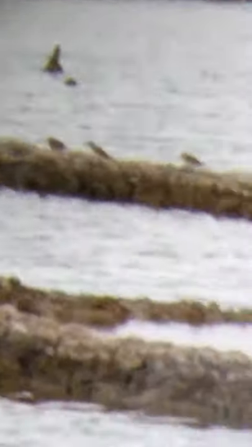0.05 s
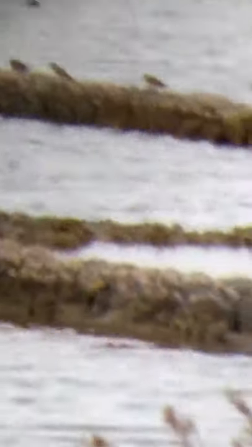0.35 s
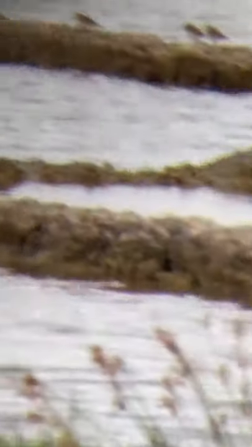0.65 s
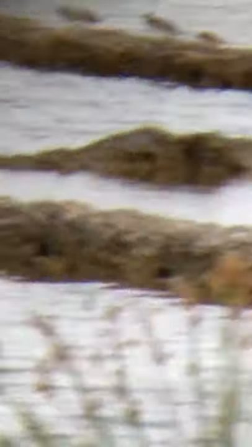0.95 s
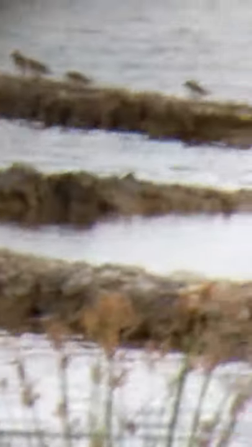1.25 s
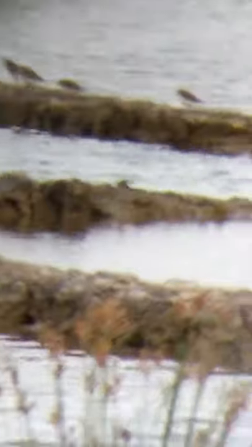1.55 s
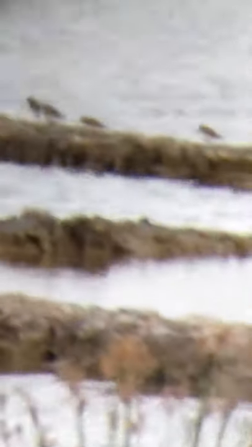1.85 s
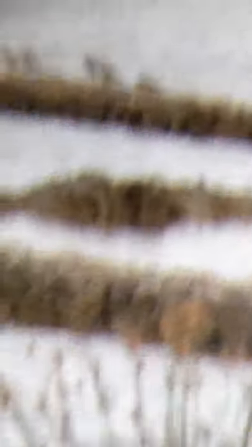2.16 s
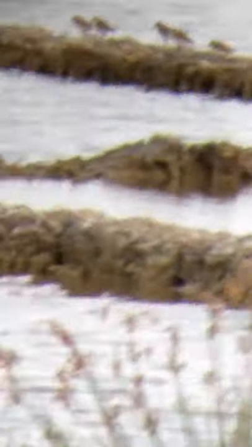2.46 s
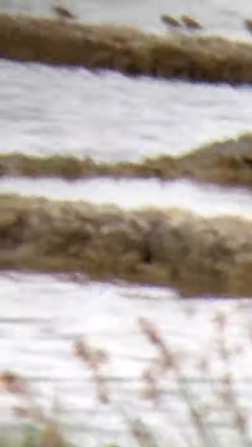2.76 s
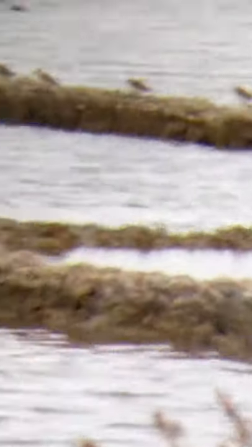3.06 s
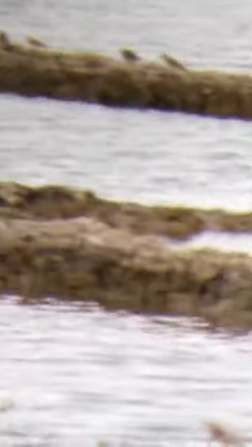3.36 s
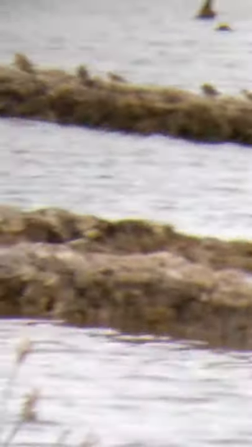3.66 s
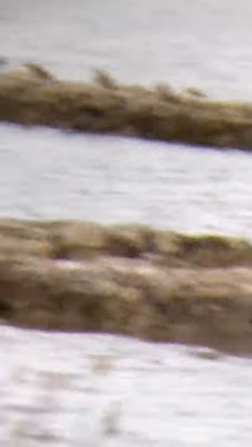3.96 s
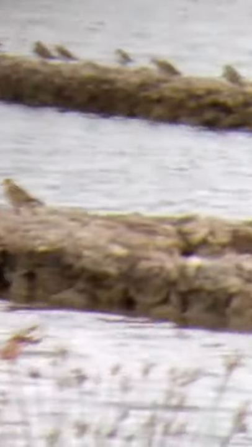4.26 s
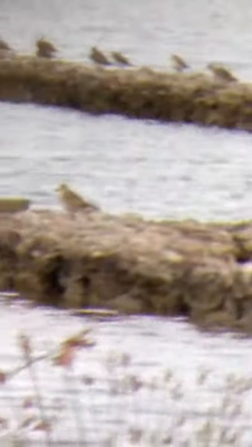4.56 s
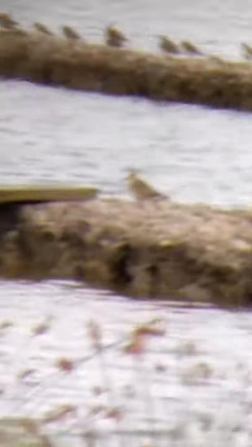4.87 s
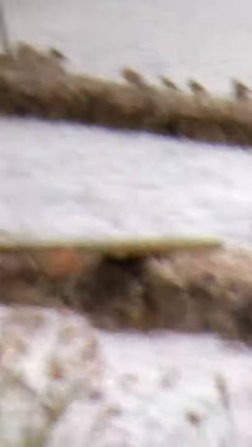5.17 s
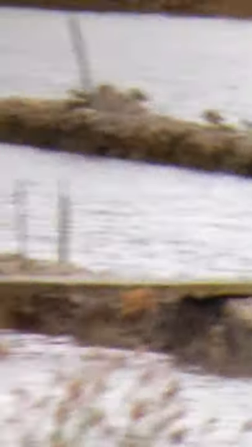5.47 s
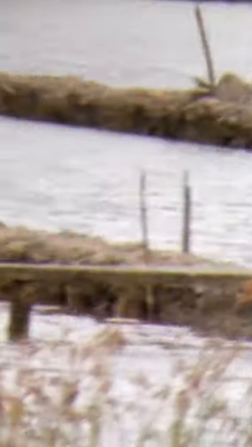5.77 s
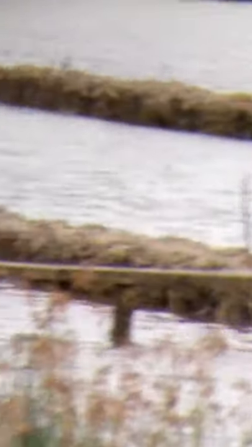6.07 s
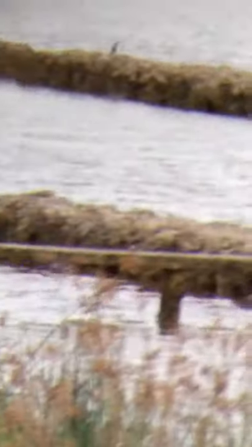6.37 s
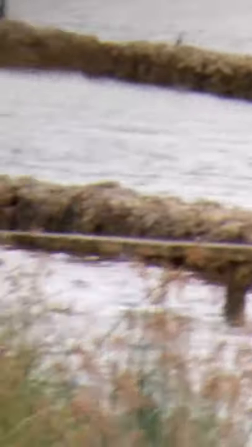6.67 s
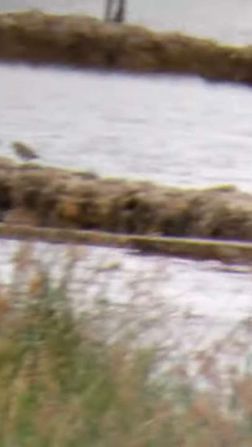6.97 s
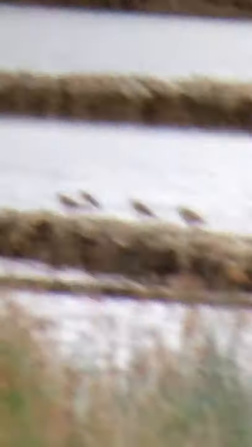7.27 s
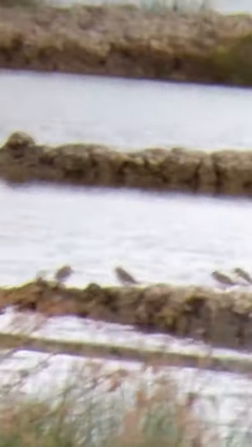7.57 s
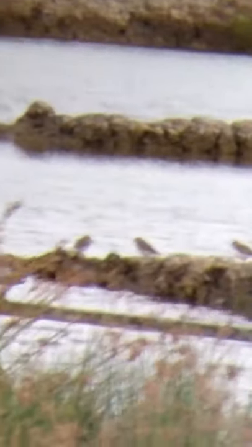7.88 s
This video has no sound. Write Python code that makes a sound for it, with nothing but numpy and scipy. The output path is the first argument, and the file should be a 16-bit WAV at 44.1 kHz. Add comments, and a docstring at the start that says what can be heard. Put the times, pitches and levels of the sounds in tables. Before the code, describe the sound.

Outdoors by the water, wind buffets a hand-held microphone from start to finish, with separate low thumps and pops on the left and a denser flutter on the right. The rumble eases briefly after about two seconds, then comes back in gusts. Light handling clicks sound close by, mainly from halfway on, while a distant wading bird's brief, high whistles are barely audible now and then over a soft hiss.

```python
"""Gusty wind over open ponds buffets the two microphone ports of a hand-held camera, each on its own.
The left gets separate thumps and pops, the right a denser flutter; in dB the flutter grows about twice
as fast as the rumble. Far off, a wading bird repeats an arched whistle, echoed by the far bank.
Right at the microphone the case ticks in the hand, and a faint hiss lies under it all."""
import sys
import numpy as np
from scipy import signal
from scipy.fft import rfft, irfft, next_fast_len
from scipy.io import wavfile
from scipy.ndimage import uniform_filter1d, minimum_filter1d, map_coordinates

SR = 44100
rng = np.random.default_rng(int(sys.argv[2]) if len(sys.argv) > 2 else 0)


def wav_out(sig):
    """Save sig, one row per channel (or a flat mono array), as 16-bit PCM at SR to the path in sys.argv[1]."""
    wavfile.write(sys.argv[1], SR, np.round(np.clip(np.atleast_2d(sig).T, -1, 1) * 32767).astype(np.int16))


N = 353241


def amp(db):
    """Decibels to gain."""
    return 10 ** (np.asarray(db) / 20)


def unit(x):
    """Scale to rms 1."""
    return x / np.sqrt(np.mean(x ** 2) + 1e-20)


def gains(spectrum, size):
    """Gain on an FFT grid from rows of f/Hz, level/dB, joined on a log frequency axis."""
    hz, db = np.transpose(spectrum)
    return amp(np.interp(np.log(np.fft.rfftfreq(size, 1 / SR) + 1), np.log(hz), db))


def curves(rows):
    """One value per sample for each column after the time."""
    times, *columns = np.transpose(rows)
    return [np.interp(np.arange(N) / SR, times, column) for column in columns]


def wobble(rate):
    """A smooth random curve, rate knots a second."""
    return map_coordinates(rng.standard_normal(int(N * rate / SR) + 4), [np.arange(N) * rate / SR])


def noise(spectrum):
    """Coloured noise of rms 1."""
    size = next_fast_len(N)
    return unit(irfft(rfft(rng.standard_normal(size)) * gains(spectrum, size), size)[:N])


def pulse(spectrum, stretch, size=4096):
    """A causal pressure pulse of this colour, stretched in time, with an envelope peak of 1."""
    cepstrum = irfft(np.log(gains(spectrum, size)))
    cepstrum[1:size // 2] *= 2  # fold to minimum phase
    cepstrum[size // 2 + 1:] = 0
    shape = map_coordinates(irfft(np.exp(rfft(cepstrum))), [np.arange(size) / stretch])
    return shape / np.abs(signal.hilbert(shape)).max()


def add(track, s, sound):
    """Mix a sound into a track, starting at s seconds."""
    start = max(round(s * SR), 0)
    part = track[..., start:start + sound.shape[-1]]
    part += sound[..., :part.shape[-1]]


def hiss(left_db, right_db, drift_db, grain_db):
    """A faint, grainy noise floor, brighter on the left, where its sheen swells and settles lower."""
    # the floor in each channel and two narrow bands of sheen: f/Hz, level/dB
    left_floor = [(100, -1), (800, 2), (1700, 3), (2200, -3), (2700, 2.5), (3400, -2.5), (4200, 1),
                  (6200, 0), (7500, 1), (9300, 3), (12000, 1.5), (15500, -6)]
    right_floor = [(100, 11), (800, 7), (1700, 2), (2200, -3.5), (2700, 2.5), (3400, -3), (4200, 0.5),
                   (5000, -5), (7000, -4.5), (9300, -4), (12000, -14), (15500, -24)]
    upper_band = [(7800, -28), (9200, -2), (10000, -8), (12500, -28)]
    lower_band = [(6300, -36), (7800, -7), (9500, -19.5)]
    # course of the sheen: t/s, upper level/dB, lower level/dB
    sheen_levels = [(0, -61, -65), (0.6, -66.5, -78), (1.9, -62.5, -70), (2.8, -65.5, -76), (4.5, -69, -67),
                    (6.5, -69, -63.5), (8, -70, -64)]
    upper_db, lower_db = curves(sheen_levels)
    sheen = amp(upper_db) * noise(upper_band) + amp(lower_db) * noise(lower_band)
    pair = np.array([amp(left_db) * noise(left_floor) + sheen, amp(right_db) * noise(right_floor)])
    return pair * amp(drift_db * wobble(7.2) + grain_db * wobble(120))


def distant_bird(waver_db, quaver, scatter_db, far_bank_s, far_bank_db):
    """A thin, quavering whistle, broken up by the wind, scattered nearby and echoed by the far bank."""
    # each call at the top of its arch: t/s, level/dB, f/Hz, gain of the rising half/dB
    whistles = [(0.135, -63.5, 3580, -3), (0.814, -63, 3600, -3), (3.115, -64, 3570, -11),
                (3.937, -66, 3560, -1), (5.813, -62, 3630, -8), (6.6, -61, 3600, -5), (7.49, -75, 3580, 5),
                (7.86, -70, 3440, -6)]
    # the arch of one call: t/s from the top, pitch ratio, level/dB
    arch = [(-.05, .92, -16), (-.033, .96, 0), (0, 1, 1), (.01, .99, -3), (.022, .965, 3), (.038, .91, -1),
            (.055, .85, -20)]
    arch_s, ratio, arch_db = np.transpose(arch)
    t = np.arange(arch_s[0], arch_s[-1], 1 / SR)
    calls = np.zeros(N)
    for top_s, db, top_hz, rise_db in whistles:
        hz = top_hz * np.interp(t, arch_s, ratio) * (1 + quaver * wobble(135)[:len(t)])
        envelope = amp(db + np.interp(t, arch_s, arch_db + rise_db * (arch_s <= 0)))
        call = envelope * np.sin(2 * np.pi * np.cumsum(hz) / SR)
        add(calls, top_s + arch_s[0], call)
        add(calls, top_s + arch_s[0] + far_bank_s, amp(far_bank_db) * call)
    calls *= amp(waver_db * np.tanh(wobble(110)))
    tail = rng.standard_normal((2, SR // 2)) * amp(-60 * np.arange(SR // 2) / SR / 0.1)  # T60 0.1 s
    scattered = signal.fftconvolve(calls[None], tail / np.linalg.norm(tail[0]), axes=1)[:, :N]
    return calls + amp(scatter_db) * scattered


def handling_ticks(pan_db, rise_s, t60, scuff_s, ring_db, ring_t60):
    """Fingers shift on the case: a sharp tick in a brief scuff, over a knock that sometimes rings."""
    # touches: t/s, level/dB, scuff/dB re the tick, knock/dB re the tick, ring f/Hz (None if dry)
    touches = [(2.167, -45, -14, -14, None), (4.4262, -36, -13, -12, None), (4.551, -45, -11, -20, None),
               (4.802, -42, -6, -5, None), (5.132, -47, -6, -12, None), (5.5602, -36.5, -9, -3.5, None),
               (6.198, -45, -8, -11, None), (6.33, -47.5, -8, -7, None), (6.5965, -45, -8, -18, None),
               (6.7595, -39, -9, -14, 4958), (7.109, -47.5, -6, -6, 1700), (7.6285, -48, -1, -1, 2600)]
    # colour of the tick and of the duller knock: f/Hz, level/dB
    tick_colour = [(1000, -20), (3500, -9.5), (7000, 8), (9500, 10.5), (13000, 3), (16000, 9.5)]
    knock_colour = [(500, -17), (1500, 4.5), (2600, 4), (3500, 4), (8000, -19)]
    bright, dull, rings = np.zeros((3, 2, N))
    t = np.arange(-SR // 20, SR // 10) / SR
    tick = np.where(t < 0, np.exp(-np.abs(t) / rise_s), amp(-60 * np.abs(t) / t60))
    scuff = np.exp(-np.abs(t) / scuff_s)
    for s, db, scuff_db, knock_db, ring_hz in touches:
        force = amp(db + np.array([[pan_db], [-pan_db]]) / 2)
        envelope = force * (tick + amp(scuff_db) * scuff)
        ring_decay = (t > 0) * amp(ring_db - 60 * np.abs(t) / ring_t60)
        ring = ring_decay * np.sin(2 * np.pi * (ring_hz or 0) * t)
        add(bright, s + t[0], envelope)
        add(dull, s + t[0], amp(knock_db) * envelope)
        add(rings, s + t[0], amp(knock_db) * force * ring)
    bright *= [noise(tick_colour), noise(tick_colour)]
    dull *= [noise(knock_colour), noise(knock_colour)]
    return bright + dull + rings


def dry_snap(s, db, relax_s):
    """One dry snap on the left: the signal jumps at once and relaxes."""
    pair = np.zeros((2, N))
    add(pair[0], s, amp(db) * np.exp(-np.arange(SR // 50) / SR / relax_s))
    return pair


def flaps(surges, port, width_spread=0.22):
    """Small eddies flap at a port at uneven times: each one pulse, wide or narrow, pushing or sucking."""
    # colour of one flap: f/Hz, level/dB
    flap_colour = [(60, -27), (180, -1.5), (320, 3), (500, -5.5), (800, -20.5), (1200, -35), (2000, -56),
                   (8000, -105)]
    rate = port["flap_rate"]
    count = int(rate * N / SR)
    jitter, direction, width = rng.random((count, 3)).T
    at = ((np.arange(count) + 2 * jitter) * SR / rate).astype(int) % N
    size_db = 2 * port["flap_spread_db"] * np.tanh(rng.standard_normal(count) / 2)
    push = np.sign(direction - .5) * amp(size_db) * surges[at]
    width_class = (width * 3).astype(int)
    stream = np.zeros(N)
    for k, stretch in enumerate(port["flap_stretch"] * np.exp([-width_spread, 0, width_spread])):
        impulses = np.bincount(at, push * (width_class == k), N)
        stream += signal.fftconvolve(impulses, pulse(flap_colour, stretch))[:N]
    return unit(stream)


def turbulence(wind_db, wake_db, rumble_colour, port):
    """Air reaches a port in lumps, which swell the rumble and, more steeply, the flaps and puffs."""
    # the soft puff of the strongest lumps: f/Hz, level/dB
    puff_colour = [(300, -15), (800, -2.5), (1400, -18.5), (2200, -28), (5000, -70)]
    lumps = amp(3.7 * port["lump_depth"] * np.tanh(wobble(port["lump_rate"]) / 2))
    rumble = unit(lumps * noise(rumble_colour))
    surges = lumps ** port["steepness"]
    flutter = flaps(surges, port) + amp(port["puff_db"]) * unit(surges * noise(puff_colour))
    rumble_db = port["rumble_db"] + wind_db + wake_db
    flutter_db = port["flutter_db"] + port["flutter_growth"] * wind_db
    return amp(rumble_db) * rumble + amp(flutter_db) * flutter


def passing_eddies(wind_db, port, count=200, pop_growth=2.7):
    """Rows for buffets(): lesser eddies arrive at random, harder and sharper in stronger wind."""
    gap_luck, thump_luck, pop_luck = rng.uniform(-1, 1, (count, 3)).T
    times = np.cumsum(-np.log((1 - gap_luck) / 2)) * port["eddy_gap_s"]  # Poisson arrivals
    local_db = np.interp(times, np.arange(N) / SR, wind_db)
    thump_db = port["thump_db"] + local_db + port["scatter_db"] * thump_luck
    pop_db = port["pop_db"] + pop_growth * local_db + port["scatter_db"] * (thump_luck + pop_luck)
    return [row for row in zip(times, thump_db, pop_db, pop_db + port["edge_db"]) if row[0] < N / SR]


def buffets(eddies, port, spread=0.1, rasp_decay_s=0.0019):
    """A big eddy pushes or sucks at the diaphragm and breaks up in a pop; a steep edge adds a rasp."""
    # colour of the eddy's pressure pulse, its pop and its edge: f/Hz, level/dB
    thump_colour = [(15, -24), (30, -26), (50, -1), (90, 1), (160, -7), (280, -14.5), (500, -29.5),
                    (1200, -80.5), (4000, -110)]
    pop_colour = [(60, -14), (200, -3), (400, 2.5), (650, -5.5), (1000, -17.5), (1600, -40.5), (2600, -72),
                  (6000, -86.5)]
    edge_colour = [(300, -36), (900, 6), (1500, 0), (2400, -18.5), (4000, -24), (9000, -58)]
    track = np.zeros(N)
    t = np.arange(SR // 100) / SR
    for s, thump_db, pop_db, edge_db in eddies:
        direction, width, pop_luck = rng.standard_normal(3)
        first_s, second_s = port["breakup_s"] * np.exp(2 * spread * rng.standard_normal(2))
        grit = rng.standard_normal(len(t)) * np.exp(-t / rasp_decay_s)
        thump = pulse(thump_colour, port["thump_stretch"] * np.exp(spread * width))
        snap = pulse(pop_colour, np.exp(spread * pop_luck / 2))
        pop = np.zeros(len(snap))
        for delay_s, size in [(0, .5), (first_s, 1), (first_s + second_s, -.65)]:  # back and forth
            add(pop, delay_s, size * snap)
        pop /= np.abs(signal.hilbert(pop)).max()
        add(track, s - np.argmax(thump) / SR, np.sign(direction) * amp(thump_db) * thump)
        add(track, s - np.argmax(pop) / SR, np.sign(pop_luck) * amp(pop_db) * pop)
        if edge_db is not None:
            rasp = signal.fftconvolve(pulse(edge_colour, 1), grit)
            add(track, s - first_s, amp(edge_db) * rasp / np.abs(rasp).max())
    return track


def wind_at(side, strength, rumble_colour, port):
    """Gusts and lulls drive one port's turbulence and lesser buffets; hard ones leave a wake of rumble."""
    # moments when the air briefly stalls, by port: t/s
    lulls = {"L": [0.125, 0.56, 1.98, 2.7, 4.99, 5.1, 6.5, 6.655, 7.27, 7.57], "R": [0.1, 1.24, 1.33, 1.46,
             3.77, 5.13, 5.929, 7.19]}
    # the hardest buffets: t/s, port, thump level/dB, pop level/dB, edge level/dB (None if blunt)
    hard_buffets = [(0.072, "L", -3, -16.5, -33), (0.163, "R", -13, -13, -31), (0.181, "L", -6.5, -21, -36),
                    (0.21, "L", -18, -11, -33), (0.237, "R", -16, -11.5, -32), (0.271, "R", -16, -19, None),
                    (0.295, "L", -22, -18, None), (0.347, "L", -6.5, -14.5, None),
                    (0.469, "R", -10.5, -16, None), (0.515, "L", -6.5, -19, -43),
                    (0.622, "L", -15.5, -22.5, None), (0.782, "R", -7.5, -25, None),
                    (0.851, "L", -15, -28, None), (0.935, "L", -3, -17, -22), (0.974, "R", -10, -17, -42),
                    (1.018, "R", -13, -19, None), (1.088, "R", -10, -20.5, None),
                    (1.113, "L", -16, -17, None), (1.174, "R", -9, -22, -39), (1.192, "L", -21, -15, -31.5),
                    (1.235, "L", -4, -11.5, -25), (1.243, "L", -10, -15, -27),
                    (1.264, "L", -10, -14.5, -35), (1.306, "L", -18, -14.5, None),
                    (1.395, "L", -21, -16.5, None), (1.416, "L", -9, -19, None),
                    (1.53, "R", -5, -23.5, None), (1.755, "L", -1.5, -17, -28),
                    (1.804, "L", -4.5, -21.5, -28), (1.841, "L", -11, -11.5, -31.5),
                    (1.894, "L", -7.5, -24, -27.5), (1.948, "L", -12.5, -24, None),
                    (2.006, "L", -13.5, -19.5, -44), (2.055, "L", -12.5, -15.5, None),
                    (2.542, "L", -11.5, -18, None), (2.758, "L", -6, -19, None),
                    (3.083, "L", -7, -40, None), (3.114, "L", -6, -26, None), (3.251, "L", -4, -25, -33.5),
                    (3.442, "L", -6, -28, None), (3.528, "L", -9.5, -12.5, -38),
                    (3.595, "R", -14, -16, None), (3.654, "R", -20, -13.5, -42),
                    (3.708, "R", -7, -8.5, -26), (3.855, "L", -15, -16, None), (3.983, "L", -8, -5.5, -24),
                    (4.02, "L", -8.5, -16, -37), (4.086, "L", -5, -16, -37),
                    (4.155, "R", -12.5, -17.5, None), (4.252, "R", -13.5, -18, None),
                    (4.278, "L", -8, -26, -33), (4.397, "L", -4, -22, None), (4.483, "R", -17, -19, None),
                    (4.608, "R", -14.5, -18, -31), (4.915, "L", -2.5, -16, -25.5),
                    (4.931, "L", -7.5, -21, None), (5.06, "R", -17, -14, None),
                    (5.143, "L", -9.5, -20, -36), (5.189, "R", -8, -12, -32), (5.207, "L", -2.5, -17, None),
                    (5.218, "R", -9, -11.5, -25.5), (5.331, "R", -10.5, -17.5, None),
                    (5.436, "R", -6, -12, -31.5), (5.559, "R", -11, -12.5, None),
                    (5.811, "R", -15, -13, None), (5.828, "L", -8.5, -10, -38),
                    (5.881, "R", -9, -15.5, -36), (6.174, "R", -10, -19, None), (6.248, "R", -27, -26, -38),
                    (6.358, "R", -11, -15, -30), (6.379, "L", -4.5, -10, -43), (6.534, "L", -12, -28, None),
                    (6.606, "L", -22, -36, None), (6.627, "L", -14.5, -40, None),
                    (6.692, "L", -9, -22.5, None), (6.805, "R", -11.5, -12, -29.5),
                    (6.852, "R", -16, -18.5, None), (6.883, "L", -10.5, -9.5, None),
                    (6.995, "L", -6, -17, -41), (7.071, "L", -10.5, -19, None), (7.165, "L", -4, -27, None),
                    (7.298, "L", -7, -17, -37), (7.338, "L", -8, -15, None), (7.448, "L", -5, -14, None),
                    (7.501, "L", -6, -15, -42), (7.634, "L", -6.5, -36, None), (7.734, "R", -13, -26, None),
                    (7.875, "L", -10.5, -6.5, -44), (7.932, "L", -3.5, -11, -34),
                    (7.959, "L", -13, -22, -38)]
    lull_db, lull_half_s = -7, 0.018
    wander_db, wander_rate = 1.4, 13
    wake_lift_db, wake_peak_s = 1.5, 0.0056
    t = np.arange(N) / SR
    from_lull = np.min([np.abs(t - s) for s in lulls[side]], axis=0) / lull_half_s
    stall = np.exp(-np.minimum(from_lull, 10) ** 2)
    wind_db = curves(strength)[0] + lull_db * stall + wander_db * wobble(wander_rate)
    hardest = [(s, *levels) for s, struck, *levels in hard_buffets if struck == side]
    starts = np.sort([-1] + [row[0] for row in hardest])
    since_buffet_s = t - starts[np.searchsorted(starts, t) - 1]
    wake_age = np.minimum(since_buffet_s / wake_peak_s, 20)
    wake_db = wake_lift_db * wake_age * np.exp(1 - wake_age)
    churn = turbulence(wind_db, wake_db, rumble_colour, port)
    return churn + buffets(hardest + passing_eddies(wind_db, port), port)


def wind():
    """Wind off the ponds strikes the microphone, whose two ports feel unrelated eddies."""
    # wind strength at each port: t/s, level/dB re a moderate breeze
    left_strength = [(0.0, 5), (0.11, 0.5), (0.33, 4), (0.52, 2), (0.68, -7.5), (0.76, -0.5), (0.84, 2),
                     (1.2, 2.5), (1.47, 2.5), (1.65, 3.5), (1.72, -10), (1.8, 1.5), (1.92, 0.5), (2.06, -2),
                     (2.2, -12), (2.47, -6), (2.63, 0), (2.87, -6), (3.02, -3), (3.25, 2.5), (3.33, -12),
                     (3.51, 0), (3.6, -6), (3.8, -6.5), (3.93, 0.5), (4.06, -2), (4.18, -6), (4.27, 2.5),
                     (4.45, -4), (4.57, -15), (4.65, 3), (4.84, -2), (4.95, 1.5), (5.1, 0), (5.2, -0.5),
                     (5.5, 1.5), (5.64, 2), (5.75, -8), (5.88, 1.5), (6.05, -5.5), (6.2, -2), (6.42, -0.5),
                     (6.6, -12.5), (6.76, -2), (6.95, -1), (7.25, 0.5), (7.42, -2), (7.8, -1), (8.01, -0.5)]
    right_strength = [(0.0, -1.5), (0.12, 0.5), (0.24, 5), (0.4, -1), (0.47, -3.5), (0.53, -12),
                      (0.69, -12), (0.78, 0.5), (0.88, -1), (1.2, 1), (1.57, 0.5), (1.72, -5.5), (2.15, -9),
                      (2.32, -6.5), (2.43, -8.5), (2.7, 1.5), (2.78, -6.5), (3.12, -6), (3.24, 2),
                      (3.449, -13), (3.61, 4.5), (3.72, -1), (3.87, -5.5), (4.1, 1), (4.38, -7), (4.65, 0),
                      (4.84, -9.5), (4.99, 4.5), (5.15, 2), (5.3, 3), (5.55, 3.5), (5.66, -6), (5.85, -0.5),
                      (6.0, -1), (6.2, 2.5), (6.43, 3.5), (6.5, -5.5), (6.61, -4), (6.67, -21), (6.77, -9),
                      (6.82, 5), (6.92, -3), (7.2, 0.5), (7.71, -2), (8.01, -11.5)]
    # slow pressure swings at each port: f/Hz, level/dB
    left_rumble = [(18, -69), (30, 3), (47, -0.5), (65, 3.5), (95, 0.5), (135, -6.5), (210, -11.5),
                   (320, -19.5), (600, -46), (1500, -101)]
    right_rumble = [(18, -42), (30, -43), (47, 0), (65, 3), (95, -3.5), (135, -4), (210, -5.5), (320, -16),
                    (600, -44.5), (1500, -99)]
    # each port in a moderate breeze; puff is re the flaps, edge re the pop; rates are per second,
    # growth is dB per dB of wind, stretch a ratio of pulse length
    left_port = dict(
        rumble_db=-22.5, lump_rate=55, lump_depth=3,
        flutter_db=-43, flutter_growth=2.57, steepness=1.15, puff_db=-18,
        flap_rate=260, flap_spread_db=1.5, flap_stretch=0.9,
        thump_stretch=1, breakup_s=0.001188, eddy_gap_s=0.11,
        thump_db=-15, pop_db=-31.5, edge_db=-29, scatter_db=4)
    right_port = dict(
        rumble_db=-23, lump_rate=75, lump_depth=2,
        flutter_db=-33, flutter_growth=1.84, steepness=1.65, puff_db=-19,
        flap_rate=300, flap_spread_db=3, flap_stretch=1,
        thump_stretch=0.61, breakup_s=0.0013, eddy_gap_s=0.14,
        thump_db=-16.5, pop_db=-25.5, edge_db=-25, scatter_db=2)
    return np.array([wind_at("L", left_strength, left_rumble, left_port),
                     wind_at("R", right_strength, right_rumble, right_port)])


def scene():
    """At the ponds: a bird far off, fingers on the case, and wind on the microphone over everything."""
    bird = distant_bird(waver_db=6.0, quaver=0.011, scatter_db=-3, far_bank_s=0.28, far_bank_db=-10)
    handling = handling_ticks(pan_db=10.5, rise_s=.0003, t60=.007, scuff_s=.007, ring_db=2, ring_t60=.04)
    snap = dry_snap(s=1.4465, db=-17, relax_s=.0005)
    gusts = wind()
    floor = hiss(left_db=-56.0, right_db=-60.0, drift_db=1.64, grain_db=1.55)
    return floor + bird + handling + snap + gusts


def record(dry):
    """The camera cuts the deepest swings, limits the biggest thumps and drops the highest treble."""
    low_cut_hz, ceiling, top_hz = 39, .71, 15850
    x = signal.sosfilt(signal.butter(4, low_cut_hz, "high", fs=SR, output="sos"), dry)
    needed_gain = ceiling / np.maximum(np.abs(x), ceiling)
    limited = x * uniform_filter1d(minimum_filter1d(needed_gain, size=400), size=400)
    size = next_fast_len(N + SR // 2)
    passband = np.fft.rfftfreq(size, 1 / SR) < top_hz
    return irfft(rfft(limited, size) * passband, size)[:, :N]


dry = scene()
out = record(dry)
wav_out(out)
```